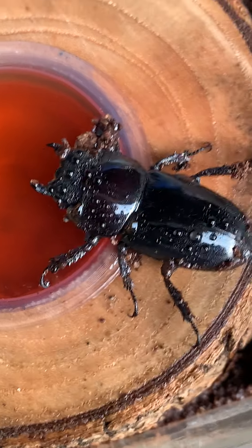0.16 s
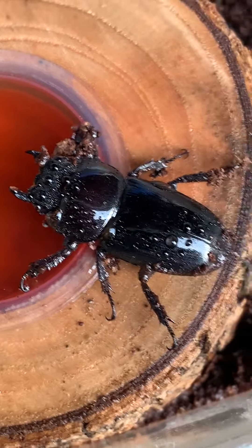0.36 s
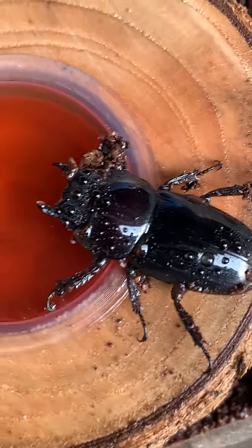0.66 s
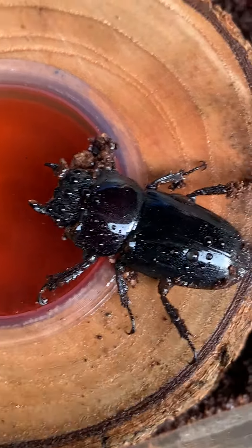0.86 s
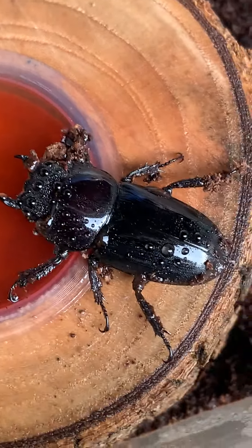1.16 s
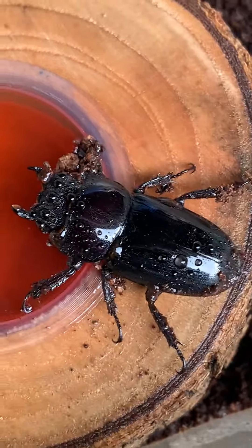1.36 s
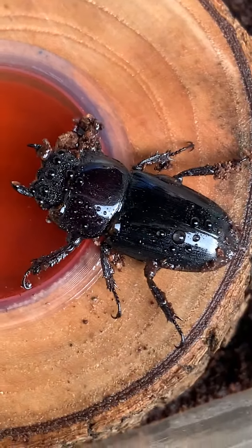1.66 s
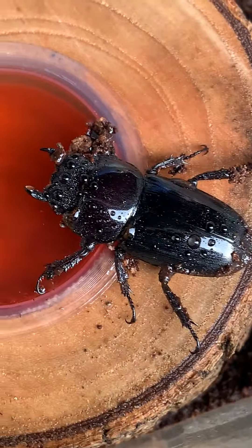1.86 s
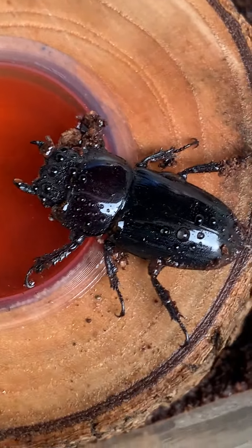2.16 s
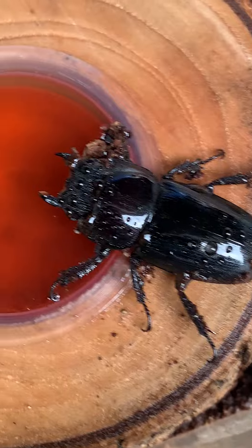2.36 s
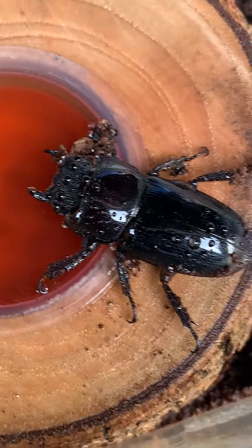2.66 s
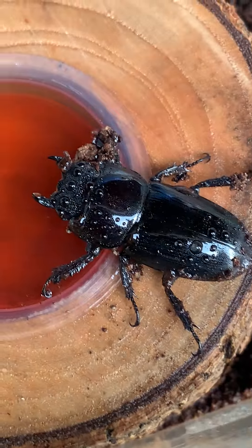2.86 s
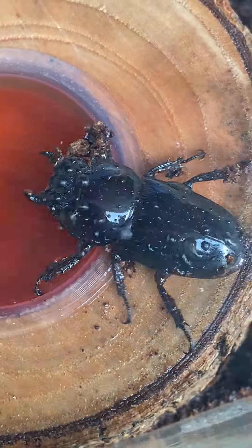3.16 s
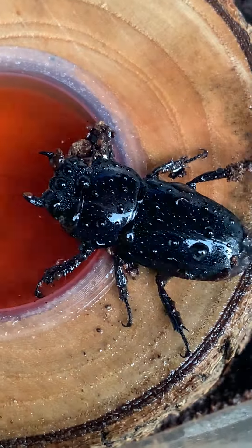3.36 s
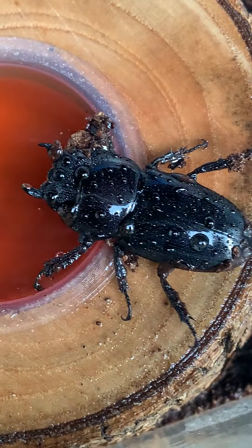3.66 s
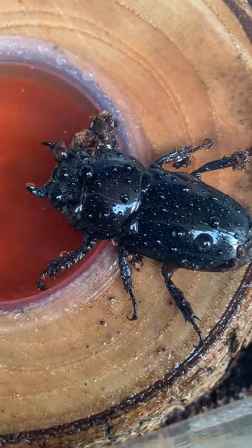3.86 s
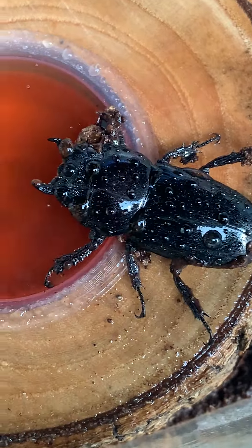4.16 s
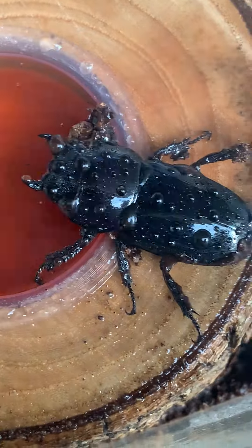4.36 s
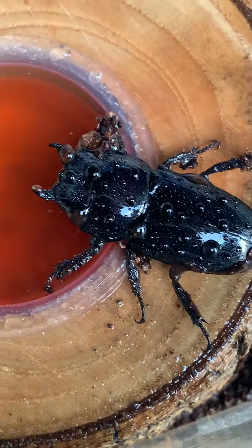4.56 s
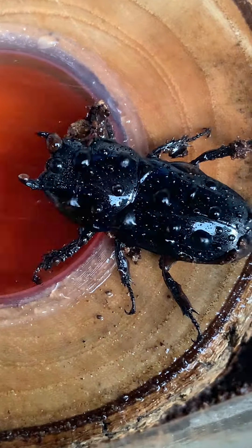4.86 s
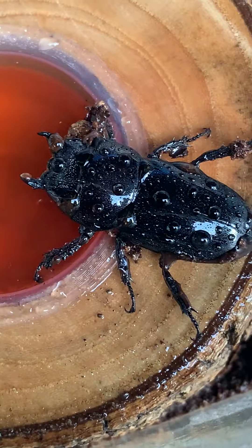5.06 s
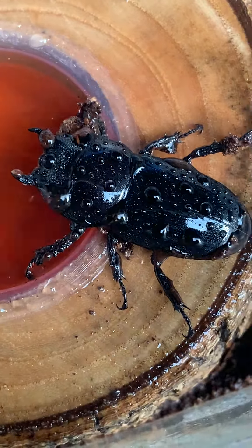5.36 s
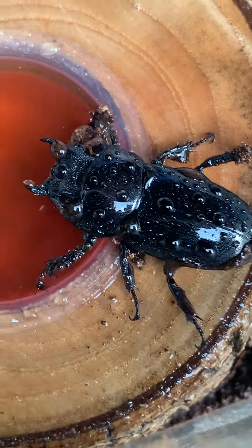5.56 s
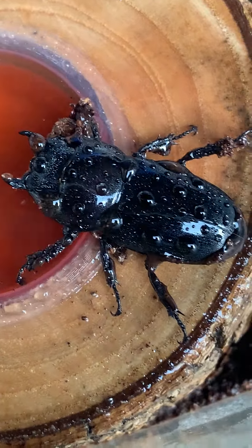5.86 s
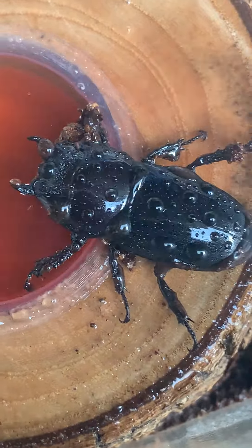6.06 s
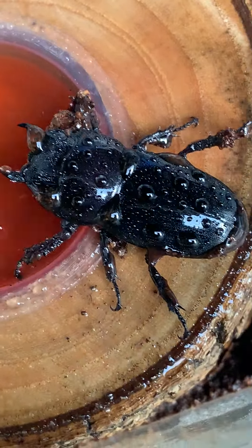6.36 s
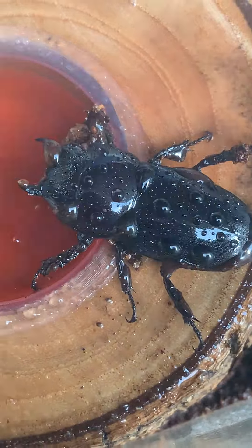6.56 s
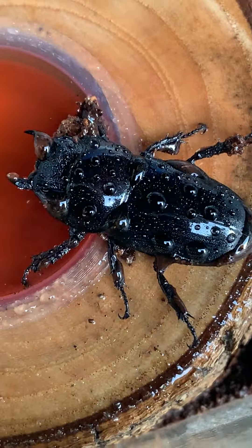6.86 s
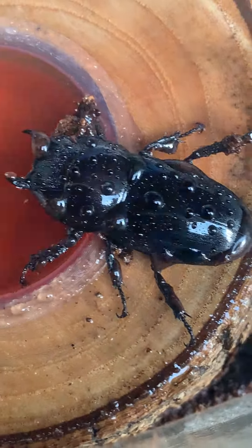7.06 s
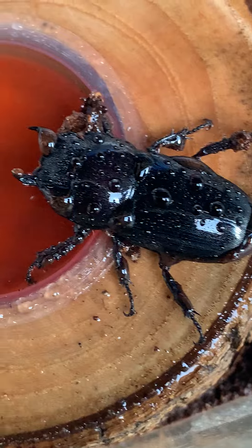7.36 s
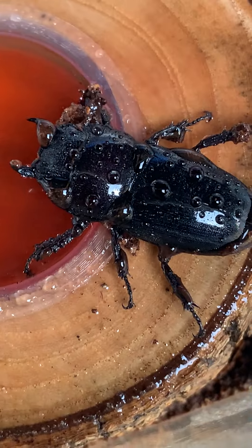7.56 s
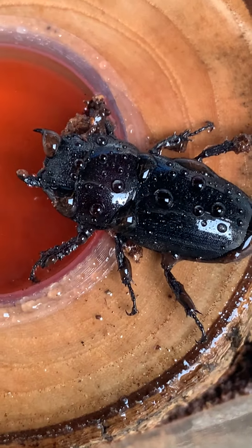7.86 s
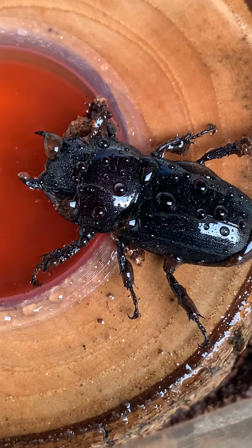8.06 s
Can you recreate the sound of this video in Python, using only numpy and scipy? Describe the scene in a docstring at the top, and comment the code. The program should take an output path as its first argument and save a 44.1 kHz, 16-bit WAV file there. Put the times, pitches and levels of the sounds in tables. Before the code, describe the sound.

A small indoor room with a faint, steady low hum and soft rumble. At about 1.4 s a plastic bottle gives one light knock; around 2.0-2.15 s it is picked up in a rapid clatter of hollow thuds, hard clacks, ticks and gritty drags. Faint skin rubbing and tiny finger squeaks surround this, with small clicks near 2.5 s. At 3.0 s a dry seal squeaks and the first, slower squirt swells into a bright hiss for a third of a second. Eight quicker squirts follow at about 3.6, 4.15, 4.6, 5.1, 5.55, 6.0, 6.45 and 6.9 s, each opening with a sharp valve snap, with droplets pattering on wood and soft air puffs, growing slightly louder. After each, the piston slides, scrapes and clicks back on its spring. After 7.25 s only hum remains, with a tiny click at 8 s. Mist is close and dry; the bottle sounds slightly farther.

```python
"""In a small room with a faint low hum, a trigger spray bottle is picked up with knocks, drags and squeaks.
It then squirts nine times onto wood close to the microphone: each pull swells a hiss of noise, with
droplets pattering and puffs of air. Quick pulls open with a snap of the valve; the slow first one squeaks.
On each release the piston slides, scrapes and clicks back on its spring. Short noise bursts make the
clicks, decaying tones make the knocks, and narrow noise makes the whistling notes."""
import sys
import numpy as np
from scipy import signal
from scipy.fft import rfft, irfft
from scipy.io import wavfile

SR = 44100
rng = np.random.default_rng(int(sys.argv[2]) if len(sys.argv) > 2 else 0)


def dump(signal):
    """Clip the signal to [-1, 1] and save it as 16-bit WAV at the path in sys.argv[1]."""
    limited = np.clip(np.atleast_2d(signal).T, -1, 1)
    pcm = np.round(limited * 32767).astype(np.int16)
    wavfile.write(sys.argv[1], SR, pcm)


N = 361619  # length of the scene [samples]

# All levels in the tables are relative: the functions set the final loudness.
# Trigger pulls: (time [s], stroke length [s], hiss peak [dB], lateness of the peak [1 = mid stroke],
# mist striking the wood compared with the hiss [dB])
PULLS = [(3.0, 0.322, -32.6, 1.57, -11.8), (3.6391, 0.274, -30.6, 1.03, -9.5),
         (4.1505, 0.253, -30.6, 1.0, -9.6), (4.6354, 0.235, -30.6, 1.03, -9.9),
         (5.1051, 0.238, -30.2, 0.91, -8.4), (5.5523, 0.239, -28.4, 1.01, -7.6),
         (5.9911, 0.223, -28.6, 0.99, -7.8), (6.4468, 0.251, -27.6, 0.96, -8),
         (6.8802, 0.217, -27.4, 1.32, -7.8)]
# Knocks as the bottle is handled: (time [s], hollow thud [dB], wall clack [dB], tick [dB],
# ring length the grip allows [times normal], tilt of the thud [dB per octave])
BOTTLE_KNOCKS = [(1.3686, -35.5, -46.5, -30, .6, 4), (1.9705, -31, -56, -26.5, .8, 4),
                 (1.9805, -35, -56, -50, .7, 4), (1.9946, -28, -31.5, -35, 1, -3),
                 (2.0157, -44, -35, -34, .8, 0), (2.029, -49, -34, -39, .7, 0),
                 (2.067, -44, -31, -33, .5, 0), (2.0824, -25.5, -27, -33, .6, 3),
                 (2.1087, -44, -28.5, -35, 1.1, 0), (2.132, -37.5, -30, -35, .9, -3),
                 (2.147, -52, -41, -41, 1.5, -4)]
# The bottle drags between knocks: (time [s], length [s], level [dB])
DRAGS = [(1.989, 0.052, -38.5), (2.04, .028, -52), (2.068, 0.02, -33), (2.094, .022, -38),
         (2.13, 0.026, -44)]
# The hand shifts on the plastic: (time [s], length [s], level [dB])
GRIP_SHIFTS = [(1.317, .08, -60.5), (1.623, .17, -68.5), (1.9, .1, -59), (2.387, .16, -68.5)]
# A finger squeaks on the plastic, then slips off: (time [s], length [s], level [dB])
FINGER_RUBS = [(1.92, .028, -58), (1.98, .011, -42), (2.318, 0.071, -58), (2.454, 0.0086, -47.5)]
# The piston scrapes back on its spring: (time [s], length [s], level [dB])
PISTON_RETURNS = [(3.403, .016, -43), (3.964, .02, -44), (4.452, .03, -44), (4.912, .03, -44),
                  (5.39, .011, -42), (5.8385, .014, -39), (6.253, .009, -38), (6.729, .013, -35),
                  (7.189, .012, -37)]
# Trigger clicks and piston slips: (time [s], level [dB])
PUMP_CLICKS = [(2.458, -47), (2.574, -51.5), (3.4031, -34), (3.4057, -32), (3.414, -36), (3.4607, -44),
               (3.5215, -50), (3.9474, -36), (3.9642, -34), (3.968, -29), (3.9791, -36), (3.9942, -39),
               (4.0012, -36), (4.0076, -40), (4.4523, -34), (4.4556, -29), (4.4651, -31), (4.4713, -34),
               (4.4787, -36), (4.5208, -47), (4.9125, -35), (4.9163, -28), (4.9265, -37), (4.9374, -35),
               (4.9751, -42), (5.391, -26), (5.3968, -29), (5.4136, -45), (5.4619, -42), (5.8387, -30),
               (5.8473, -29), (5.8721, -38), (6.2552, -30), (6.2582, -31), (6.2944, -45), (6.327, -48),
               (6.718, -29), (6.7314, -24), (6.7382, -30), (6.7519, -33), (6.7598, -30), (6.785, -36),
               (7.1893, -31), (7.1972, -28), (7.2132, -30), (7.2323, -32), (8.015, -48)]
# Roughness of the seal's squeak: (share of its length [0-1], roughness [0-1])
SEAL_ROUGHNESS = [(0, .8), (.3, .15), (.78, .2), (.87, .95), (1, .95)]

# Ways the bottle's hollow can ring: (frequency [Hz], level [dB], time to fall 60 dB [s])
HOLLOW_RING = [(202, -4, 0.075), (274, 2, 0.062), (412, 4, 0.055), (505, -7, 0.06), (760, -9, 0.05)]
# Ways the bottle's wall can ring: (frequency [Hz], level [dB], time to fall 60 dB [s])
WALL_RING = [(1170, -5.5, 0.036), (1582, 1.5, 0.032), (1730, 3, 0.028), (1930, -3.5, 0.02),
             (2460, -6.5, 0.014)]
# Steady resonances of the nozzle: (frequency [Hz], level [dB])
NOZZLE_NOTES = [(1590, -21.5), (2390, -21), (3400, -23), (6020, -17), (8050, -17.5), (11250, -17.5)]
# Notes of the swirl chamber: (frequency at rest [Hz], level [dB])
SWIRL_NOTES = [(8200, -14.5), (9150, -15.5), (12600, -16), (13600, -15), (14900, -15)]
# Steady hum of the room: (frequency [Hz], level [dB])
HUM_NOTES = [(53, -71.5), (106.5, -56.5), (158, -69), (211, -67), (409, -77), (780, -79.5), (899, -82.5),
             (1023, -85.5)]

# Colours of the sounds, each as (frequency [Hz], level per Hz [dB])
# mist leaving the nozzle: (frequency [Hz], level per Hz [dB])
MIST_COLOUR = [(700, -6), (1150, -5.2), (1700, -2.2), (2900, -5.2), (3700, 1), (4900, -4.8), (6100, -1),
               (7000, -5), (8500, -1), (10000, -3), (11300, .2), (12600, -1.5), (14100, .3), (15700, -4.5)]
# puff of air at the microphone: (frequency [Hz], level per Hz [dB])
PUFF_COLOUR = [(20, -36), (42, -13.5), (70, -6.5), (200, -4.5), (330, -9), (700, -21), (2000, -52)]
# valve snapping open: (frequency [Hz], level per Hz [dB])
VALVE_COLOUR = [(600, -5.5), (1800, -13), (2400, -1), (3400, -4), (4600, 8), (7000, -8), (11500, 0),
                (15600, 0), (16600, -26)]
# squeaking seal: (frequency [Hz], level per Hz [dB])
SEAL_COLOUR = [(1700, -19), (3200, -3), (4800, 3), (6200, -8), (10400, 3), (15500, -1)]
# piston and trigger: (frequency [Hz], level per Hz [dB])
PISTON_COLOUR = [(600, -21), (1100, -13), (1500, -18), (1750, -3.5), (2000, -11), (2430, 3), (2750, -6),
                 (3250, 3.5), (4300, -4), (7000, -5), (8600, -1), (13400, -1), (16000, -7)]
# tick of a knock: (frequency [Hz], level per Hz [dB])
TICK_COLOUR = [(500, -18.5), (3500, -4), (5200, 5), (10500, -1), (15500, 2), (16500, -37)]
# loose rattle after a knock: (frequency [Hz], level per Hz [dB])
RATTLE_COLOUR = [(150, -6), (400, 0), (900, -13), (1650, 4.5), (2300, -7.5), (3400, -12.5), (4200, -6),
                 (5500, -9.5), (15000, -24.5)]
# dragging bottle: (frequency [Hz], level per Hz [dB])
DRAG_COLOUR = [(500, -11), (2400, 5), (3300, -10), (4100, 4), (5000, -8), (6500, 8.5), (7300, -3),
               (8500, -2), (12500, 1), (16000, -9)]
# skin rubbing on plastic: (frequency [Hz], level per Hz [dB])
SKIN_COLOUR = [(600, 0), (2600, -7), (5500, .5), (16000, -7)]
# rumble of the room: (frequency [Hz], level per Hz [dB])
RUMBLE_COLOUR = [(20, -44), (32, -21), (50, -5.5), (130, -2), (200, -.5), (300, -13.5), (550, -24),
                 (800, -24.5), (1100, -23), (1450, -31), (2700, -34), (4500, -39.5), (8000, -44.5),
                 (13000, -47), (16000, -50.5)]

# How long the room rings: (frequency [Hz], time to fall 60 dB [s])
ROOM_DECAY = [(200, 0.15), (1000, 0.11), (3500, 0.32), (8000, 0.17), (15000, 0.12)]
# Likeness of the left and right channels: (frequency [Hz], likeness [0-1])
CHANNEL_LIKENESS = [(100, .985), (350, .92), (650, .55), (1500, .85), (3000, .58), (4200, .65), (5100, .98),
                    (6000, .78), (7200, .95), (8500, .85), (9800, .997), (11200, .88), (15000, .98)]
# How far the left channel leads: (frequency [Hz], phase [radians])
LEFT_LEAD = [(25, -.15), (80, -.24), (180, -.55), (350, -1.1), (650, -1), (1000, 0), (2500, 1.4),
             (3600, 1.5), (5150, 3.14), (7100, 6.28), (9750, 9.42), (12300, 12.57), (14950, 15.71),
             (16000, 16.3)]
# Loudness of the left channel over the right: (frequency [Hz], difference [dB])
LEFT_BALANCE = [(280, -.7), (800, -5), (1600, -2.5), (2500, -5), (4000, -1), (5000, 0), (16000, 0)]

SCRAPE_PER_S, RATTLE_PER_S = 1500, 500  # average tiny catches a second


def spray():
    """Mist hisses from the nozzle, patters low on the wood and puffs air at the microphone."""
    hiss, impact, pressure = strokes()
    jet = mist_jet()
    low_pass = signal.butter(2, 2600, fs=SR, output="sos")
    low = signal.sosfiltfilt(low_pass, jet)
    tones = nozzle_tones() + swirl_tones(pressure)
    tones = np.array([[1], [0]]) * tones  # one point source, common to both channels
    puff = colour(rng.standard_normal((2, N)), PUFF_COLOUR)
    return hiss * (jet - low + tones) + impact * (amp(10.5) * low + amp(-7.5) * puff)


def strokes():
    """Pressure swells over each pull; flow levels off when choked, and mist takes time to reach the wood."""
    choke, flight_s = 1.5, .008
    t = np.arange(N) / SR
    hiss, impact, pressure = np.zeros((3, N))
    for s, length, db, late, impact_db in PULLS:
        part = np.clip((t - s) / length, 0, 1)
        push = abs(np.sin(np.pi * part ** late)) + 1e-12
        pressure += push
        after = t - s - length
        # the last droplets are still landing
        settling = np.exp(-np.maximum(after, 0) / .045 + np.minimum(after, 0) / .013)
        # the valve shuts just before the stroke ends
        push = push / (1 + np.exp(np.clip((after + .014) / .005, -30, 30)))
        flow = np.tanh(choke * push ** .95) / np.tanh(choke)
        hiss += amp(db) * (flow + amp(-31.5) * settling)
        landing = np.interp(t - flight_s, t, push)
        # the mist needs speed to reach the wood
        impact += amp(db + impact_db) * (landing ** 1.05 + amp(-27) * settling)
    return hiss, impact, pressure


def mist_jet():
    """Smooth hiss mixed with uneven droplet impulses, flickering in level."""
    sizes = amp(3 * np.minimum(rng.exponential(1, N), 3))
    drops = (rng.random(N) < 5000 / SR) * sizes  # about 5000 drops a second
    patter = evened(drops * rng.choice([-1, 1], (2, N)))
    noise = evened(rng.standard_normal((2, N)) + .5 * patter)
    return echoes(colour(noise, MIST_COLOUR) * amp(drift(120)))


def echoes(x, count=6, delay_s=(.001, .009), share=.17):
    """Nearby surfaces throw hiss back; the aim shifts from pull to pull, so each has its own colour."""
    out = x.copy()
    starts = [round(s * SR) for s, *_ in PULLS]
    for a, b in zip(starts, starts[1:] + [N]):
        delays, signs = rng.uniform(*delay_s, count), rng.choice([-1, 1], count)
        for delay, sign in zip(delays, signs):
            lag = round(delay * SR)
            out[:, a:b] += sign * share * x[:, a - lag:b - lag]
    return out / np.sqrt(1 + count * share ** 2)


def nozzle_tones():
    """Steady narrow resonances colour the hiss."""
    return sum(amp(db) * whistle(hz, width_hz=94) for hz, db in NOZZLE_NOTES)


def swirl_tones(pressure):
    """The swirl chamber sings faintly, its pitch dipping as the pressure peaks and wandering slowly."""
    dip, wander = .105, .012  # shares of the pitch
    bend = 1 - dip * pressure ** 2 + wander * drift(3)
    return sum(amp(db) * whistle(hz * bend, width_hz=45) for hz, db in SWIRL_NOTES)


def valve():
    """Quick pulls open the valve at one same pressure: a sharp snap, then a thump as water starts moving."""
    snaps, thumps = np.zeros((2, 2, N))
    t = np.arange(1500) / SR
    thump = np.sin(2 * np.pi * 240 * t) * np.sin(np.pi * np.minimum(t / .019, 1))
    for s, *_ in PULLS[1:]:
        snap = crack(hold=.0018, decay=.0011) + amp(-9) * crack(hold=.0018, decay=.012)
        add(snaps, s, amp(-27.5) * snap)
        add(thumps, s + .005, amp(-37.5) * thump)
    return colour(snaps, VALVE_COLOUR) + thumps


def squeak():
    """The dry seal slips almost regularly, rising in pitch and level, then lets go in rough rubbing."""
    start_s, length_s, rise_s, fall_s = 2.97, .06, .0225, .005
    from_hz, top_hz = 805, 866
    t = np.arange(0, length_s, 1 / SR)
    speed = np.minimum(t / rise_s, 1)
    rough = np.interp(t / length_s, *np.transpose(SEAL_ROUGHNESS))
    jitter = 1 + .035 * rough * drift(500)[:len(t)]
    turns = np.cumsum((from_hz + (top_hz - from_hz) * speed) * jitter) / SR
    k = np.arange(2, 19)[:, None]  # overtones of the slipping
    starts = rng.random((2, len(k), 1))
    slips = evened(np.cos(2 * np.pi * (k * turns + starts)).sum(1))
    rubbing = grains(SCRAPE_PER_S)[:len(t)] * rng.standard_normal(slips.shape)
    level = amp(-38) * speed * np.minimum((length_s - t) / fall_s, 1)
    out = np.zeros((2, N))
    add(out, start_s, level * (np.sqrt(1 - rough ** 2) * slips + rough * rubbing))
    return colour(out, SEAL_COLOUR)


def piston():
    """The returning piston scrapes in sharp slips; these and the trigger's clicks ring the plastic pump."""
    out = np.zeros((2, N))
    for s, length, db in PISTON_RETURNS:
        add(out, s, amp(db) * crack(hold=length, decay=.002, size=2400))
    out *= grains(SCRAPE_PER_S)
    for s, db in PUMP_CLICKS:
        click = crack(hold=.0003, decay=.0007)
        pump_ring = crack(hold=.0003, decay=.0028)
        add(out, s, amp(db) * (click + amp(-10) * pump_ring))
    return amp(2) * colour(out, PISTON_COLOUR)


def piston_slides():
    """Before it scrapes, the piston slides back with a faint grainy rising note, different each time."""
    slide_s, from_hz, to_hz = .032, 1900, 4380
    spread_db, spread = 3, .2  # variation of the level, and of the length and pitch rise
    t = np.arange(N) / SR
    level, travel = np.zeros((2, N))
    variations = rng.uniform(-1, 1, (len(PISTON_RETURNS), 2))
    for (s, *_), (size, pace) in zip(PISTON_RETURNS, variations):
        # runs from 0 to 1 up to time s, and is 0 elsewhere
        part = np.clip((t - s) / (slide_s * (1 + spread * pace)) + 1, 0, 1) % 1
        level += amp(-62 + spread_db * size) * np.sin(np.pi * part)
        travel = np.maximum(travel, part * (1 - spread * pace))
    hz = from_hz + (to_hz - from_hz) * travel
    level *= grains(RATTLE_PER_S) * amp(3.7 * drift(200))
    return level * np.array([whistle(hz, width_hz=1200) for _ in range(2)])


def finger_squeaks():
    """A finger rubbing on the plastic gives brief, fluttering notes of narrow noise."""
    t = np.arange(N) / SR
    level = np.zeros(N)
    for s, length, db in FINGER_RUBS:
        level += amp(db) * np.sin(np.pi * np.clip((t - s) / length, 0, 1))
    notes = np.array([whistle(2720, width_hz=450) for _ in range(2)])
    return level * notes * amp(3.7 * drift(200))


def knocks():
    """Each knock ticks, thuds in the hollow of the bottle and rings its wall, which rattles briefly."""
    body, ticks, rattle = np.zeros((3, 2, N))
    for s, thud_db, clack_db, tick_db, free, tilt_db in BOTTLE_KNOCKS:
        thud = ring(HOLLOW_RING, scatter=.02, free=free, rise=.0025, tilt_db=tilt_db)
        clack = ring(WALL_RING, scatter=.03, free=free, rise=.0008)
        add(body, s + .0011, amp(thud_db + 8) * thud)
        add(body, s, amp(clack_db + 7) * clack)
        add(ticks, s, amp(tick_db) * crack(hold=.001, decay=.0025))
        add(rattle, s, amp(clack_db - 12) * crack(hold=.0025, decay=.02, size=4000))
    rattle *= grains(RATTLE_PER_S)
    return body + colour(ticks, TICK_COLOUR) + colour(rattle, RATTLE_COLOUR)


def scrapes():
    """Between knocks the bottle drags, crackling as it catches many times a second."""
    t = np.arange(N) / SR
    level = np.zeros(N)
    for s, length, db in DRAGS:
        part = np.clip((t - s) / length, 0, 1)
        level += amp(db) * np.sqrt(abs(np.sin(np.pi * part)))
    noise = grains(SCRAPE_PER_S) * rng.standard_normal((2, N))
    return colour(level * noise, DRAG_COLOUR)


def rustles():
    """Grainy rubbing that swells and fades with each shift of the grip."""
    t = np.arange(N) / SR
    level = np.zeros(N)
    for s, length, db in GRIP_SHIFTS:
        level += amp(db) * np.exp(-(2 * (t - s) / length - 1) ** 2)
    noise = amp(4.9 * drift(160)) * rng.standard_normal((2, N))
    return colour(level * noise, SKIN_COLOUR)


def room(x):
    """The room answers with a diffuse tail of noise, each band dying at its own speed."""
    hz, t, bands = signal.stft(rng.standard_normal((2, SR * 3 // 4)), SR, nperseg=256)
    fading = bands * amp(-60 * t / read(ROOM_DECAY, hz)[:, None])
    tail = signal.istft(fading, SR, nperseg=256)[1]
    tail *= 1 - np.exp(-np.arange(tail.shape[1]) / SR / .0022)
    return signal.fftconvolve(x, tail / np.linalg.norm(tail[0]), axes=1)[:, :N]


def background():
    """Low room rumble of shaped noise, with hum tones that waver in level and phase."""
    t, hz = np.arange(N) / SR, np.fft.rfftfreq(N, 1 / SR)
    hum = np.zeros(N)
    for f, db in HUM_NOTES:
        level = amp(db + 2.7 * drift(4.5)) * np.sqrt(2)
        hum += level * np.sin(2 * np.pi * f * t + .67 * drift(8))
    spectrum = rfft(rng.standard_normal((2, N))) * amp(read(RUMBLE_COLOUR, hz))
    rumble = evened(irfft(spectrum, N))
    return amp(-53.5 + drift(2)) * rumble + hum


def amp(db):
    """Turns decibels into a gain."""
    return 10 ** (np.asarray(db) / 20)


def evened(x):
    """Scales to an average strength (rms) of 1."""
    return x / np.sqrt(np.mean(x ** 2) + 1e-20)


def read(points, hz):
    """Reads a table between its points, on a log-frequency axis."""
    f, value = np.transpose(points)
    return np.interp(np.log(hz + 1), np.log(f + 1), value)


def add(mix, s, sound):
    """Mixes a sound in at time s."""
    part = mix[:, round(s * SR):][:, :sound.shape[-1]]
    part += sound[..., :part.shape[1]]


def colour(x, points, size=2048):
    """Filters without sounding early (minimum phase); white noise keeps its power."""
    gain = evened(amp(read(points, abs(np.fft.fftfreq(size, 1 / SR)))))
    response = np.exp(np.conj(signal.hilbert(np.log(gain + 1e-5))))
    taps = np.fft.ifft(response).real
    return signal.oaconvolve(x, taps[None], axes=1)[:, :N]


def drift(rate_hz):
    """Random wander of rms 1; a higher rate makes it faster."""
    hz = np.fft.rfftfreq(N, 1 / SR)
    return evened(irfft(rfft(rng.standard_normal(N)) * np.exp(-(hz / rate_hz) ** 2), N))


def crack(hold, decay, size=1200):
    """A noise burst that holds (s) and dies (s), different in each row; starts at rms 1."""
    t = np.arange(size) / SR
    return rng.standard_normal((2, size)) * np.exp(-np.maximum(t - hold, 0) / decay)


def ring(modes, scatter, free, rise, tilt_db=0, size=5000):
    """Struck tones, peak near 1; the grip sets how long they ring and the place of the blow tilts them."""
    t = np.arange(size) / SR
    hz, db, t60 = np.transpose(modes)[:, :, None]
    db = db + tilt_db * np.log2(hz / hz.mean())
    hz = hz * (1 + scatter * rng.standard_normal((2, *hz.shape)))
    fade = amp(db - 60 * t / (t60 * max(free, .1)))
    swing = fade * np.sin(2 * np.pi * hz * t)
    return swing.sum(1) * (1 - np.exp(-t / rise)) / np.linalg.norm(amp(db))


def whistle(hz, width_hz):
    """Noise in a narrow resonance that can follow a pitch curve; rms 1."""
    step = 32  # the slow wobble is drawn every 32 samples, then joined by lines
    coarse = rng.standard_normal((2, N // step + 2))
    pole = np.exp(-np.pi * width_hz * step / SR)
    wobble = signal.lfilter([1], [1, -pole], coarse[0] + 1j * coarse[1])
    wobble = np.interp(np.arange(N) / step, np.arange(len(wobble)), wobble)
    carrier = np.exp(2j * np.pi * np.cumsum(hz * np.ones(N)) / SR)
    return evened((wobble * carrier).real)


def grains(per_s, size=200):
    """A level of rms 1 made of tiny uneven catches, each dying within a millisecond or so."""
    catches = (rng.random(N) < per_s / SR) * rng.uniform(.3, 1, N)
    fade = np.exp(-np.arange(size) / SR / .00089)
    return evened(np.convolve(catches, fade)[:N])


def scene():
    """Mist is close and dry, the bottle farther and wetter; row one is shared by left and right, row two differs."""
    mist = spray()
    bottle = valve() + squeak() + piston() + piston_slides()
    bottle += finger_squeaks() + knocks() + scrapes() + rustles()
    echoing = room(amp(-23) * mist + amp(-16) * bottle)
    return mist + bottle + echoing + background()


def record(dry):
    """Left and right share part of the sound, with a phase lead and balance by pitch; the top is cut off."""
    hz = np.fft.rfftfreq(N, 1 / SR)
    common, different = rfft(dry)
    same = np.clip(read(CHANNEL_LIKENESS, hz), 0, 1)
    lean = amp(read(LEFT_BALANCE, hz))
    right = same * common + 1j * np.sqrt(1 - same ** 2) * different
    right = right * np.exp(-1j * read(LEFT_LEAD, hz))
    # the balance leaves the total power unchanged
    channels = irfft(np.array([common * lean, right]) * np.sqrt(2 / (1 + lean ** 2)), N)
    low_pass = signal.firwin(255, 15850, window=("kaiser", 8), fs=SR)
    return signal.oaconvolve(channels, low_pass[None], "same")


dry = scene()
out = record(dry)
dump(out)
```